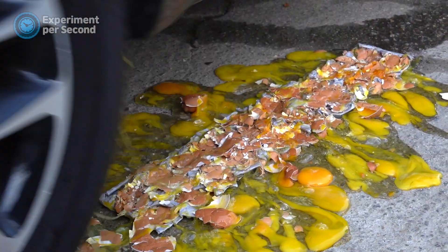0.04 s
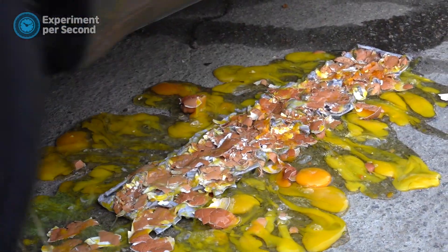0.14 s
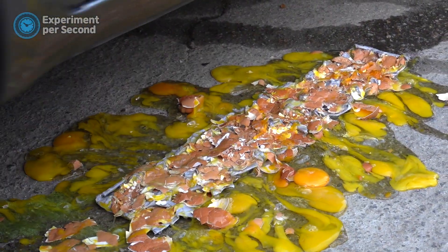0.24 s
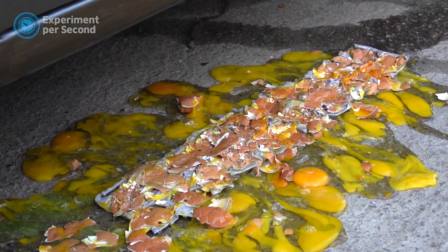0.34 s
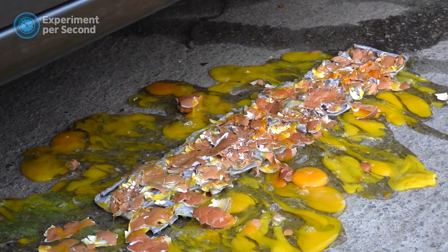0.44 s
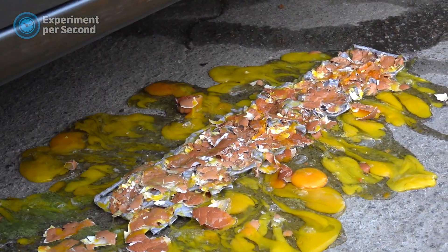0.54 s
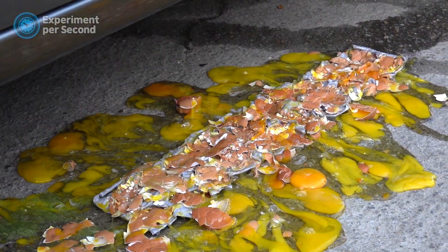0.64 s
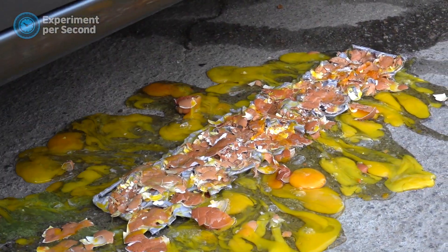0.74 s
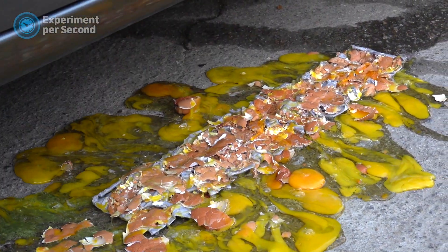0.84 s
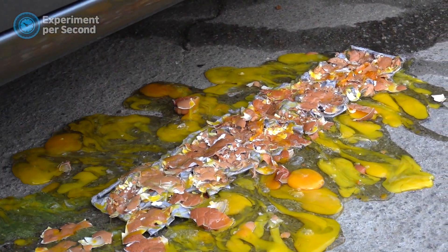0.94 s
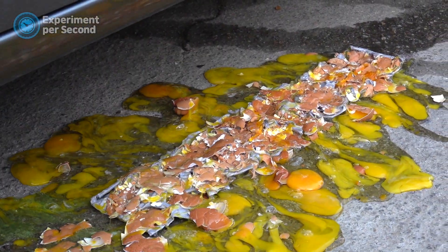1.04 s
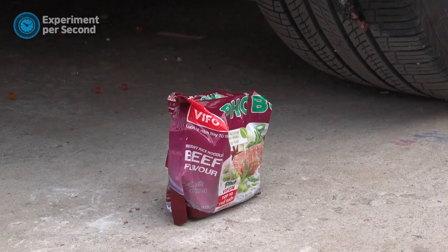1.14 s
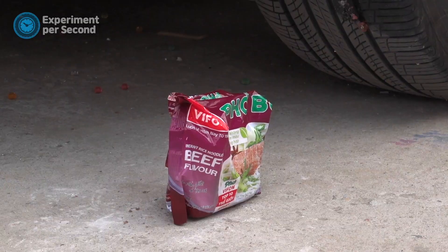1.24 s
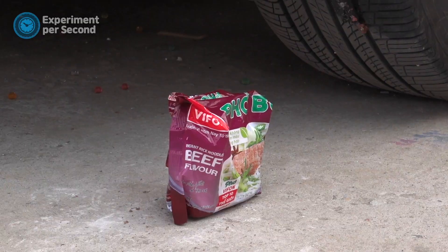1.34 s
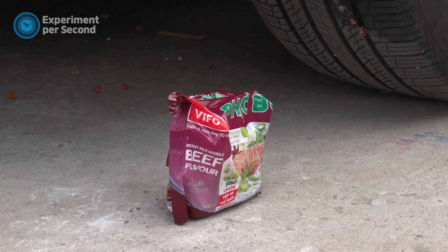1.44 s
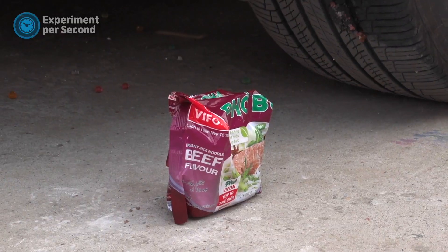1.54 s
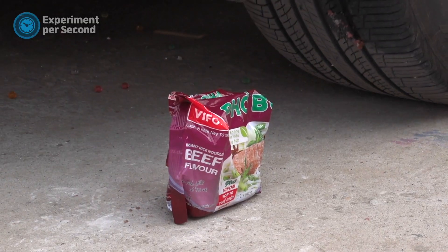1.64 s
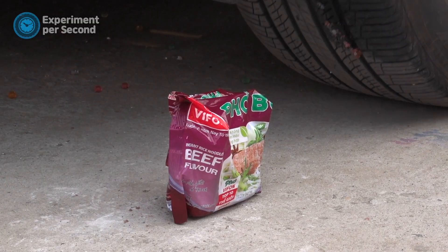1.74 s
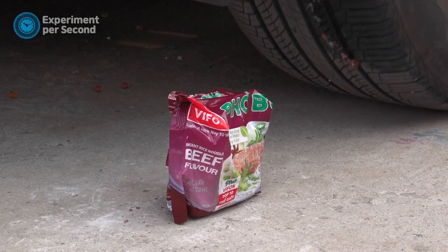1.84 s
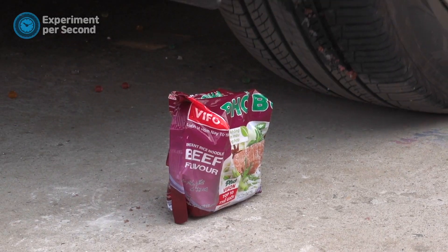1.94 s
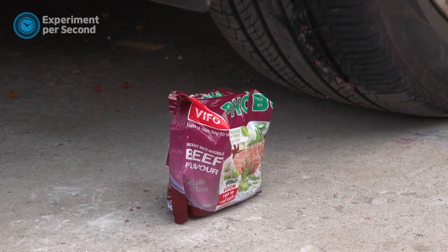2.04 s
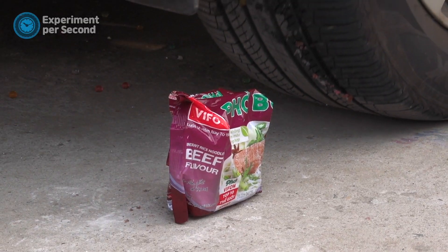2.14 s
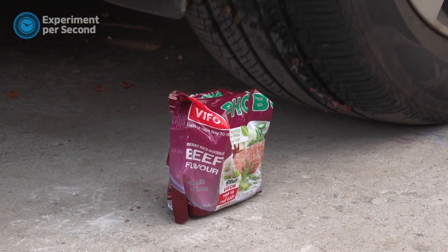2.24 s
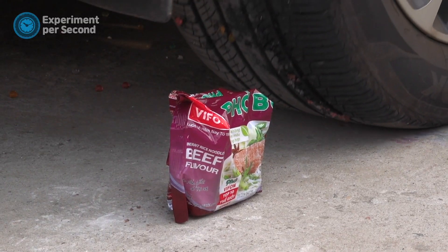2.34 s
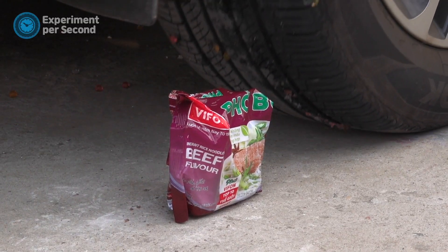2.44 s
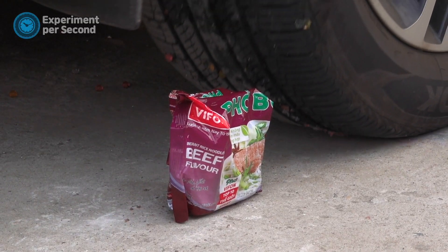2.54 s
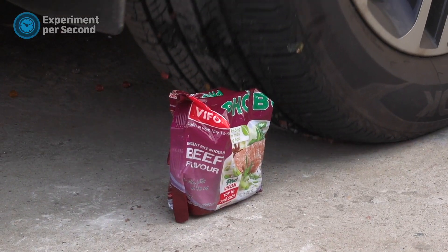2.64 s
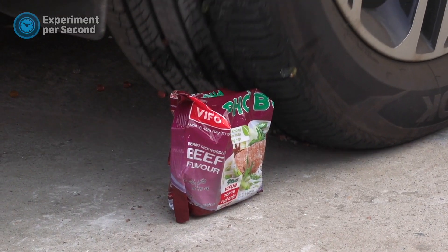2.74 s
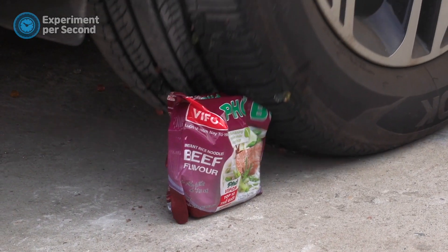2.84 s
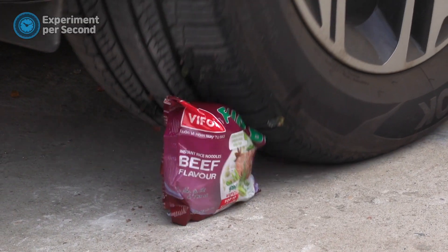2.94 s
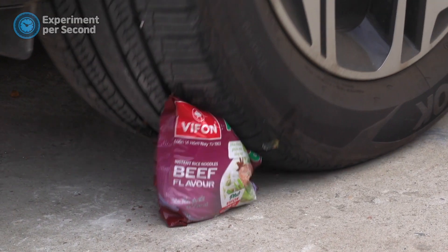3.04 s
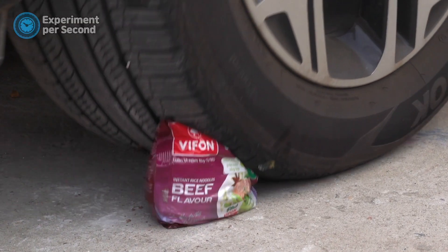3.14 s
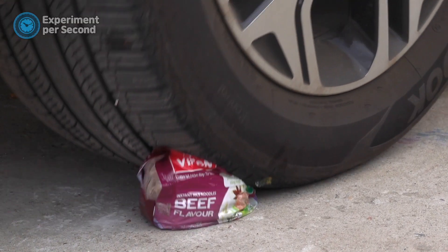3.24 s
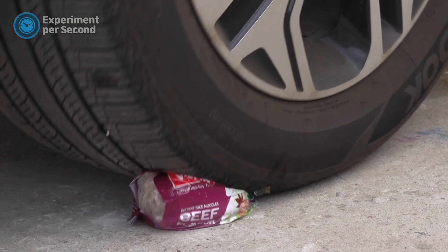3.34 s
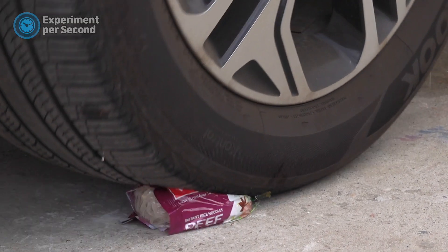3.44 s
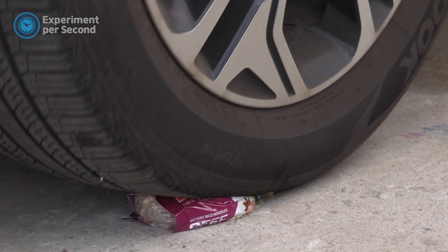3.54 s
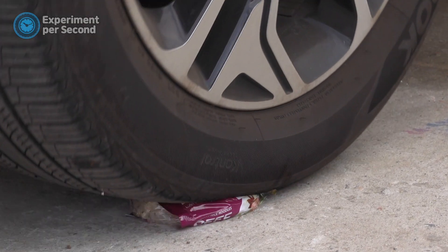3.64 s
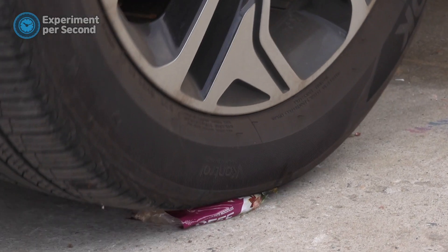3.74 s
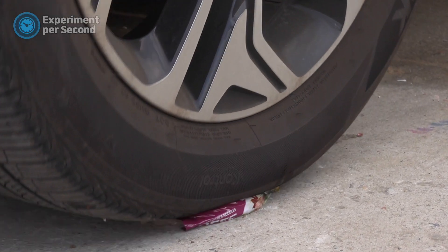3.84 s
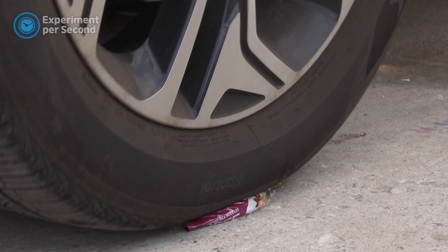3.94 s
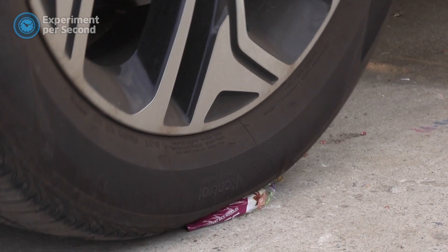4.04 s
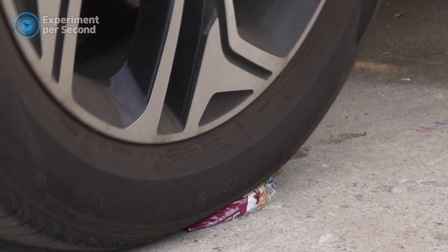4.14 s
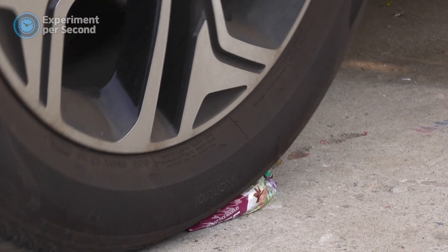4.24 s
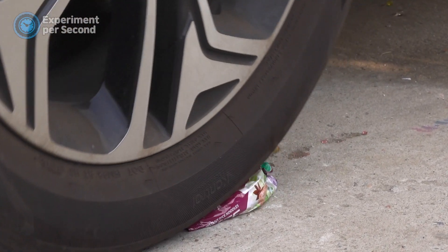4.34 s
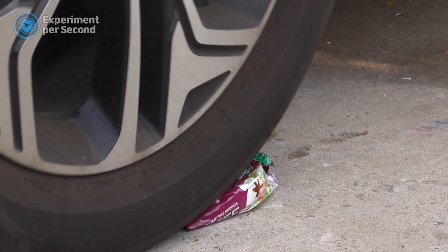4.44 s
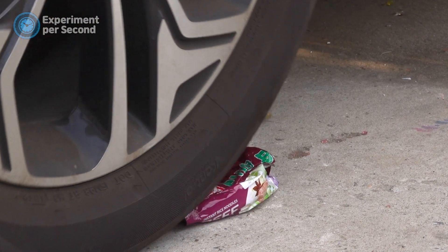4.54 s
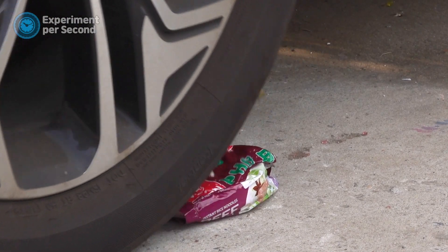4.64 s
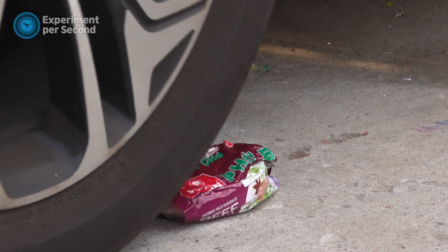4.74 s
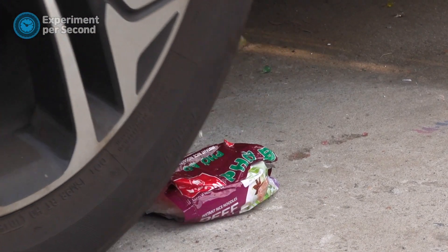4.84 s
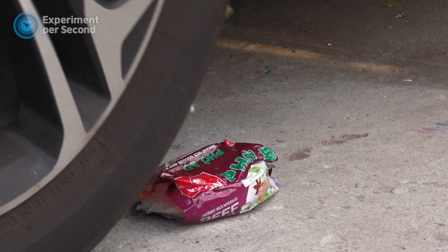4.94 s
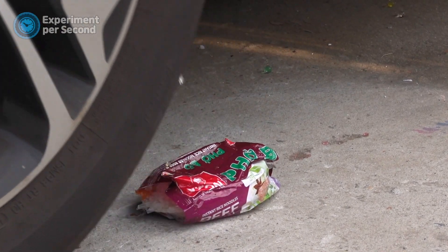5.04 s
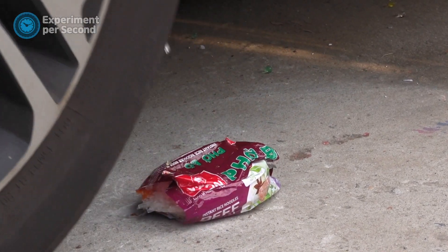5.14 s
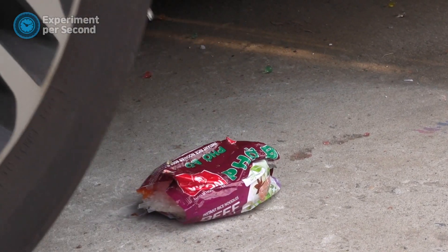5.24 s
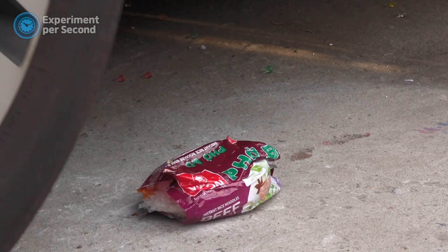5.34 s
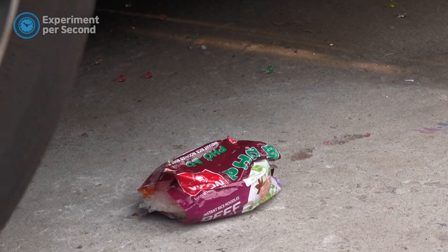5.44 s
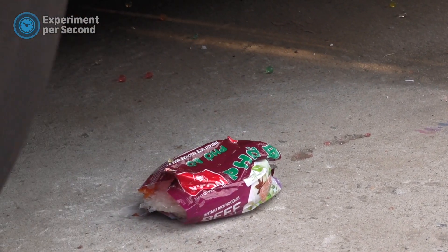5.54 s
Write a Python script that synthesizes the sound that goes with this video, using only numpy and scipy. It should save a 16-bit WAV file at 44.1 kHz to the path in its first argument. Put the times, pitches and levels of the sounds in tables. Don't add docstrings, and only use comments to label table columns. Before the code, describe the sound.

Outdoors, close to the pavement, a car idles at moderate level from 0 s, its exhaust pulses a fast, low flutter under smooth engine clatter, with one small grit knock near 0.1 s. It fades from about 0.5 s and is faint by 0.9 s. At 1.13 s the scene cuts with a tiny bump to a slower, quiet idle, more throbbing and metallic, with sparse faint grit ticks until 1.9 s. From 2.2 s the engine swells, clear by 2.7 s. At 2.88 s foil snaps sharply, then brittle dry noodles break in a dense, bright, surging crackle, fullest from 3.1 to 3.5 s, with loud dry pops and hollow knocks above the idle. It thins towards 4.05 s, when a flurry of crisp snaps marks the pack springing back until 4.4 s. The engine rises briefly around 4.4 s, last crumbs tick, and by 5 s only faint idle and light hiss remain until 5.6 s.

```python
import sys
import numpy as np
from scipy import signal
from scipy.fft import rfft, irfft
from scipy.io import wavfile
from scipy.ndimage import uniform_filter1d

SR = 44100
rng = np.random.default_rng(int(sys.argv[2]) if len(sys.argv) > 2 else 0)


def makeup_ratio(level_db):
    decades = np.asarray(level_db, float) / 20
    return 10 ** decades


def digitize_waveform(pressure):
    field = np.atleast_2d(pressure).T
    bounded = np.clip(field, -1, 1)
    quanta = np.round(bounded * 32767).astype(np.int16)
    wavfile.write(sys.argv[1], SR, quanta)


N = 246519

# frequency in Hz, likeness 0-1.
NEAR_LIKENESS = [(60, 1), (180, 1.0), (550, 1), (1650, 0.99), (4970, 0.85), (15000, 0.99)]
# time in seconds, crunch level in dB.
TYRE_WEIGHT = [
    (2.882, -36),
    (2.92, -38),
    (2.95, -30.5),
    (3.1, -23),
    (3.48, -23),
    (4.05, -29),
    (4.14, -35.5),
    (4.36, -39.5),
    (4.75, -51),
]


def evened(x):
    return x / np.sqrt(np.mean(x ** 2) + 1e-20)


def read(points, hz):
    f, value = np.transpose(points)
    return np.interp(np.log(hz + 1), np.log(f + 1), value)


def below(x, hz, order=2):
    return signal.lfilter(*signal.butter(order, hz, fs=SR), x)


def resonate(x, hz, width):
    return signal.lfilter(*signal.iirpeak(min(hz, .45 * SR), hz / width, SR), x)


def colour(x, points):
    level_db = np.maximum(read(points, np.fft.rfftfreq(4096, 1 / SR)), -100)
    cepstrum = irfft(np.log(makeup_ratio(level_db)))
    cepstrum[1:2048] *= 2
    cepstrum[2049:] = 0
    response = irfft(np.exp(rfft(cepstrum)))[None, :2048]
    return signal.oaconvolve(x, response, axes=1)[:, :x.shape[1]]


def pair(count, likeness, lead_s=0):
    hz = np.fft.rfftfreq(count, 1 / SR)
    same = np.clip(read(likeness, hz), 0, 1)
    a, b = rfft(rng.standard_normal((2, count)))
    mid = a * np.sqrt((1 + same) / 2)
    side = b * np.sqrt((1 - same) / 2)
    delay = np.exp(-2j * np.pi * hz * lead_s)
    return irfft([mid + side, (mid - side) * delay], count)


def add(mix, s, sound):
    part = mix[:, round(s * SR):][:, :sound.shape[1]]
    part += sound[:, :part.shape[1]]


def exhaust(turns, orders, spread, even_lead):
    thump = 0
    for k, db in orders:
        phase = 2 * np.pi * k * turns + spread * k ** 2 + even_lead * (1 - k % 2)
        thump = thump + makeup_ratio(db) * np.cos(phase)
    return evened(thump)


def engine_noise(turns, clatter, bay, lead, depth, ring_db, tick_db):
    # frequency in Hz, likeness 0-1.
    wide_likeness = [(60, 1.0), (180, 1), (550, 0.92), (1650, 0.8), (4970, 0.39), (15000, 0.65)]
    left_lead_s = 4e-5
    cycle, part = np.divmod(turns + lead, 1)
    chance = rng.standard_normal((len(bay) + 1, 99))[:, cycle.astype(int)]
    burst = np.minimum(part / 0.082, 1) * np.exp(-(part / .5) ** 2)

    throb = 1 - depth + depth * burst * makeup_ratio(2.5 * chance[0])
    throb = throb / throb.mean()
    noise = evened(colour(pair(len(turns), wide_likeness, left_lead_s), clatter))
    low, middle = below(noise, 440), below(noise, 9600)
    smooth = noise - middle + low
    noise = (middle - low) * throb + smooth * throb ** .35

    rattle = pair(len(turns), wide_likeness, left_lead_s)
    rings = 0
    for (hz, width, db), luck in zip(bay, chance[1:]):
        blow = rattle * (0.05 + burst * makeup_ratio(0.66 * luck))
        rings = rings + makeup_ratio(db) * evened(resonate(resonate(blow, hz, width), hz, 1.26 * width))

    tick = rattle * np.exp(-((turns % 1 - .33) / .12) ** 2)
    for _ in range(2):
        tick = resonate(tick, 8350, 350)
    return noise + makeup_ratio(ring_db) * rings + makeup_ratio(tick_db) * evened(tick)


def engine_stretch(fader, blend, idle, orders, clatter, bay, stroke):
    s, fader_db = np.transpose(fader)
    t = np.arange(round(s[0] * SR), min(round(s[-1] * SR), N)) / SR
    thump_above_db, shade_db, shade_per_db, tick_db = blend
    first, spread, even_lead, lead, depth, ring_db, fade_s = stroke
    clatter_db = np.interp(t, s, fader_db)
    duck_db = -3 * np.interp(t, (3.0, 3.3, 3.9, 4.3), [0, 1, 1, 0])
    turns = np.cumsum(np.interp(t, *np.transpose(idle))) / SR + first

    thump = exhaust(turns, orders, spread, even_lead)
    noise = engine_noise(turns, clatter, bay, lead, depth, ring_db, tick_db)
    low = below(noise, 1504, order=1)
    shade_db = shade_db + shade_per_db * (clatter_db - fader_db.max())
    noise = low + makeup_ratio(np.minimum(shade_db, 3)) * (noise - low)

    fade_out = (3.55 - t) / .1 if t[-1] < 4 else 1
    ends = np.clip(np.minimum((t - t[0]) / fade_s, fade_out), 0, 1)
    thump_db = clatter_db + thump_above_db + duck_db
    return t[0], (makeup_ratio(thump_db) * thump + makeup_ratio(clatter_db + 4.0) * noise) * ends


def engine():
    # time in seconds, level in dB.
    faders = [
        [(0.0, -35.5), (0.47, -38), (0.77, -44.5), (0.93, -51), (1.134, -51)],
        [(1.13, -49), (2.14, -48), (2.38, -39.5), (2.68, -34.5), (2.95, -34), (3.25, -37.5), (3.55, -39.5)],
        [(3.45, -39), (4.2, -38), (4.4, -35), (4.86, -42), (5.03, -52.5), (5.59, -53.5)],
    ]
    # thump above clatter in dB, treble shade in dB, extra shade in dB per dB of fade,
    # injector tick in dB.
    blends = [
        (0, -1, 0.22, -45),
        (-0.1, 0.17, 0.08, -22.5),
        (1.5, 1, 0.08, -30),
    ]
    # time in seconds, firings per second in Hz.
    idles = [
        [(0, 29.9), (.3, 29.8), (.5, 30.9), (1.13, 31)],
        [(1.134, 25.4), (1.35, 26.55), (2.75, 26.55), (3, 26.34)],
        [(3.45, 26.32)],
    ]
    # multiple of the firing rate, level in dB.
    exhausts = [
        [(1, 0.5), (2, 6), (3, 4), (4, -23), (5, -3), (6, -18), (7, -3.5), (8, -3)],
        [(1, -0.5), (2, 2.5), (3, 3.5), (4, -1.5), (5, -4), (6, -4), (7, -9), (8, -3)],
        [(1, -2.5), (2, 3), (3, 3.5), (4, -2.5), (5, -15.5), (6, -13), (7, -8), (8, -6.5), (9, -15), (10, -10),
         (11, -17), (12, -20.5)],
    ]
    # frequency in Hz, level in dB per Hz.
    clatters = [
        [(60, -31), (100, -13), (120, -11.5), (370, -6), (850, -14.5), (1400, -16), (3500, -19), (6000, -25),
         (11000, -28.5), (15600, -32)],
        [(59, -49), (100, -6), (341, -3), (421, -13), (615, -4.5), (827, -14.5), (1000, -10), (1320, -13.5),
         (1460, -9), (1890, -15), (2940, -16.5), (15600, -35.5)],
        [(59, -42.5), (100, -6), (253, 1), (387, -6.5), (590, -5.5), (1140, -11), (1400, -5.5), (1630, -12),
         (2880, -14.5), (6290, -23.5), (15600, -35.5)],
    ]
    # frequency in Hz, width in Hz, level in dB.
    bays = [
        [(394, 36, -3), (1256, 50, 0.5), (1810, 100, -6), (2610, 200, -0.5)],
        [(713, 62, -5.5), (1026, 12, -9), (1454, 81, -0.5), (2580, 78, -14), (2844, 72, -10.5), (3420, 58, -14),
         (8200, 63, -29)],
        [(501, 154, -3.5), (737, 38, -4.5), (1410, 92, -1), (1654, 100, -6), (2770, 330, -8), (3350, 110, -8.5),
         (4070, 70, -16)],
    ]
    # first firing in turns, pipe smear in rad, lead of even harmonics in rad,
    # clatter lead in turns, throb depth 0-1, ringing in dB, fade-in in seconds.
    strokes = [
        (.88, -0.037, 1.3, 0.64, 0.28, -18.5, 0.00077),
        (0.698, -0.204, .05, 0.36, 0.47, -7, 0.0024),
        (.78, -0.045, 1.2, 0.53, 0.51, -8, 0.043),
    ]
    sound = np.zeros((2, N))
    for stretch in zip(faders, blends, idles, exhausts, clatters, bays, strokes):
        add(sound, *engine_stretch(*stretch))
    return sound


def snap(s, peak_db, hz, knock_db, knock_hz):
    u = np.arange(800) / SR
    shape = makeup_ratio(-60 * u / .0013) + makeup_ratio(-17 - 60 * u / .014)
    tick = pair(len(u), NEAR_LIKENESS) * shape * np.minimum(u / 0.0003, 1)
    tick = tick - below(tick, 2600)
    tick = tick + 1.3 * resonate(tick, hz, .4 * hz)
    knock = resonate(rng.standard_normal(len(u)) * makeup_ratio(-60 * u / 0.0049), knock_hz, 240)
    knock = resonate(knock, knock_hz, 570)
    knock = makeup_ratio(knock_db - 7.0) * knock / abs(knock).max()
    return s, makeup_ratio(peak_db + .7) * (tick / abs(tick.mean(0)).max() + knock)


def grit():
    # start in seconds, peak in dB, ring in Hz, knock above the peak in dB, knock in Hz.
    grains = [(0.084, -24.5, 2200, 3, 1900), (1.135, -51, 3000, 22, 220), (4.535, -30, 6500, -20, 900),
              (4.552, -23, 9000, -23, 900), (1.139, -49, 3200, 20, 800), (1.146, -49, 3140, 20, 760),
              (4.237, -16, 7000, -16, 900), (4.326, -16, 12000, -19, 900), (1.352, -44, 11900, -24, 900),
              (1.414, -47, 12000, -20, 900), (1.817, -43, 10900, -20, 900), (1.822, -41, 8000, -20, 900),
              (1.843, -48, 11000, -20, 900), (4.85, -46, 9000, -20, 900), (4.916, -39, 10000, -20, 900)]
    return grains


def clear_snaps():
    # start in seconds, peak in dB, ring in Hz, knock above the peak in dB, knock in Hz.
    folding = [(2.8829, -12, 5860, -16, 1600), (2.8857, -9, 5330, -21, 1500),
               (2.8964, -10, 11700, -27, 650), (2.9463, -14, 14900, -20, 1460),
               (2.9492, -9, 7900, -18, 1420), (2.9617, -12, 4500, -16, 560), (2.9834, -11, 5500, -13, 820),
               (2.9871, -11, 9700, -22, 690), (2.9924, -13, 7000, -10, 730), (2.9985, -9, 14400, -18, 1030),
               (3.0236, -14, 7400, -6, 600), (3.0315, -6, 9200, -21, 696), (3.0437, -7, 7600, -17, 1120)]
    loaded = [(3.1144, -14, 2240, -3, 619), (3.1354, -15, 2480, -18, 778), (3.1764, -13.5, 2250, 6.5, 650),
              (3.2184, -9, 4460, -3, 1070), (3.2374, -9, 2070, 5, 537), (3.2757, -5, 2460, -12, 570),
              (3.3147, -8, 2410, -13, 1460), (3.4879, -3, 2030, -17, 1540), (3.5074, -24, 2640, -18, 1410),
              (3.5662, -3, 2500, -26, 1490), (3.6013, -5, 2760, -24, 522), (3.6724, -8, 2490, -19, 754),
              (3.6964, -12, 4720, -28, 560), (3.7309, -11, 2510, -6, 574), (3.8025, -3.5, 4240, -7, 514),
              (3.8568, -5.5, 3800, -6, 1080), (3.9184, -4.5, 2520, -6.5, 972),
              (3.9522, -12, 2400, -14, 1040), (3.9747, -22, 2030, -18, 544),
              (4.0144, -5.5, 2770, -10, 1410)]
    released = [(4.036, -9, 9000, 0, 1030), (4.0548, -14, 2200, 3, 990), (4.0631, -8, 6800, -6, 1420),
                (4.08, -8, 6300, -11, 1550), (4.0854, -7, 6500, -5, 1420), (4.1044, -11, 8300, -14, 1460),
                (4.1116, -6.5, 2500, -11, 1640), (4.1231, -6, 2700, -20, 1640),
                (4.1324, -10, 8300, -17, 1460), (4.1444, -7, 3700, -5, 1030), (4.1481, -7, 8600, -14, 1080),
                (4.1759, -5, 4100, -19, 650), (4.1919, -6, 10600, -13, 1030),
                (4.2042, -6, 12300, -10, 1030), (4.2184, -14, 12700, -14, 600),
                (4.2392, -6, 7900, -21, 1380), (4.2704, -6, 6100, -8, 1420), (4.2772, -10, 2400, -13, 1160),
                (4.2825, -8, 6500, -11, 1420), (4.3016, -10, 7400, -4, 1340), (4.3649, -11, 9000, -9, 690),
                (4.3898, -10, 9600, -13, 1420), (4.4841, -22, 12300, -9, 650),
                (4.5818, -20, 9000, -4, 1420)]
    return [*folding, *loaded, *released]


def crackle(density):
    count = len(density)
    size = makeup_ratio(3.2 * np.minimum(rng.exponential(1, count), 4))
    size *= rng.random(count) < density / SR
    size /= np.sqrt(density)
    kind = rng.integers(0, 30, count)
    out = np.zeros((2, count))
    u = np.arange(300) / SR
    for k, hz in enumerate(np.linspace(500, 15000, 30)):
        tick = pair(len(u), NEAR_LIKENESS) * makeup_ratio(-60 * u / rng.uniform(.0005, .0022))
        tick = 1.4 * evened(tick) + evened(resonate(tick, hz, 300 + 0.1 * hz))
        out += signal.oaconvolve((size * (kind == k))[None], tick, axes=1)[:, :count]
    return evened(out)


def clumping(count, span):
    return evened(uniform_filter1d(uniform_filter1d(rng.standard_normal(count), span), span))


def crunch():
    # frequency in Hz, level in dB per Hz.
    foil_spectrum = [(180, -13.5), (300, -9.5), (454, -23.5), (526, -1.5), (836, -7.5), (1490, -7.5),
                     (1760, -9.5), (2450, -1.5), (3140, -5.5), (15600, -14.5)]
    # frequency in Hz, width in Hz, level in dB.
    hollows = [(549, 17, -2), (730, 99, -31), (1540, 640, -20), (2300, 1500, -5)]
    s, weight_db = np.transpose(TYRE_WEIGHT)
    t = np.arange(round(s[0] * SR), round(s[-1] * SR)) / SR
    level_db = np.interp(t, s, weight_db)
    density = 10 ** np.maximum(3.75 - 0.05 * (level_db - weight_db.max()), 2.9)
    clumps_db = 2.0 * clumping(len(t), 80)
    clumps_db += 1.2 * clumping(len(t), round(.009 * SR))

    out = crackle(density) + makeup_ratio(-10) * pair(len(t), NEAR_LIKENESS)
    out = out * makeup_ratio(clumps_db)
    foil = evened(colour(out, foil_spectrum))
    hollow = sum(makeup_ratio(db) * evened(resonate(out, hz, width)) for hz, width, db in hollows)
    low = below(foil + makeup_ratio(-20) * hollow, 3040)
    crumble_db = np.interp(t - s[0], [0, 0.17], [-7, 2.5])
    crushed = foil - below(foil, 3540) + makeup_ratio(crumble_db) * low
    return t[0], makeup_ratio(level_db + 2.5) * crushed * signal.windows.tukey(len(t), .01)


def swarm():
    start_s, end_s, count = 3.06, 4.1, 70
    place, ring, knock, a, b = rng.random((count, 5)).T
    place = 3 * place - 1
    s = start_s + (end_s - start_s) * (np.arange(count) + place) / count
    peak_db = -9.5 + 0.5 * np.sqrt(12) * (a - .5)
    weight_db = np.interp(s, *np.transpose(TYRE_WEIGHT)) + 25
    knock_db = -19 + weight_db + 3.5 * np.sqrt(12) * (b - .5) - peak_db
    ring_hz = 2200 * (15700 / 2200) ** ring
    knock_hz = 517 * (1900 / 517) ** (knock ** 1.45)
    return zip(s, peak_db, ring_hz, knock_db, knock_hz)


def scene():
    # time in seconds, left above right in dB.
    sides = [(0.0, 1), (0.54, 2), (0.98, 2.5), (1.26, 1), (2.75, 1.5), (3.08, -1.0), (4.25, -0.5),
             (4.53, 1), (5.59, 3)]
    mix = engine()
    add(mix, *crunch())
    pan_db = np.interp(np.arange(N) / SR, *np.transpose(sides))
    mix *= makeup_ratio([pan_db / 2, -pan_db / 2])
    for row in [*grit(), *clear_snaps(), *swarm()]:
        add(mix, *snap(*row))
    return mix


def top_cut(x):
    return signal.sosfilt(signal.butter(12, 17010, fs=SR, output="sos"), x)


def record(dry):
    hiss = makeup_ratio(-69 - 11) * np.diff(rng.standard_normal((2, N + 2)), 2)
    side_bass = below(dry - dry[::-1], 250, order=1) / 2
    limited = 0.95 * np.tanh((dry - side_bass + hiss) / 0.81)
    low_pass = signal.firwin(401, 15950, window=("kaiser", 9), fs=SR)
    band = signal.oaconvolve(limited, low_pass[None], "same")
    return top_cut(band)


dry = scene()
out = record(dry)
digitize_waveform(out)
```